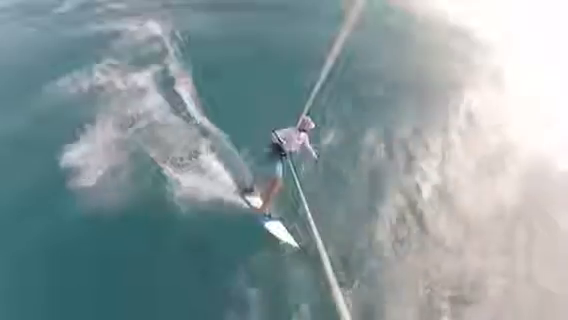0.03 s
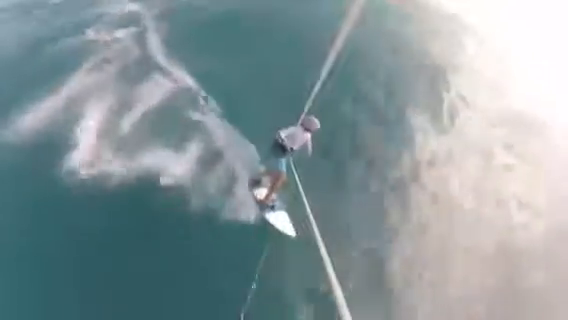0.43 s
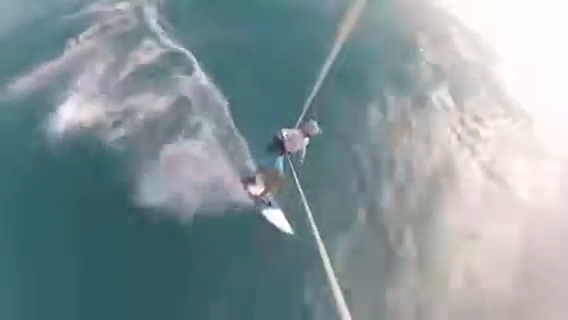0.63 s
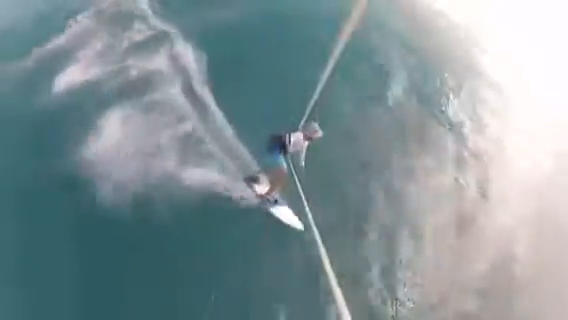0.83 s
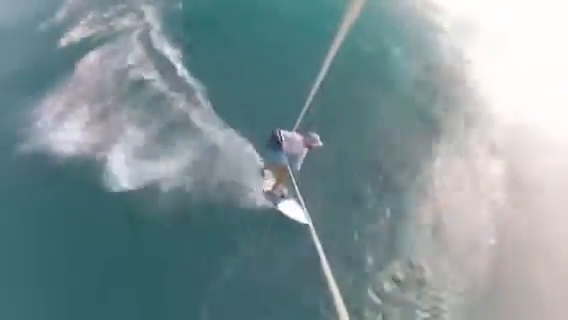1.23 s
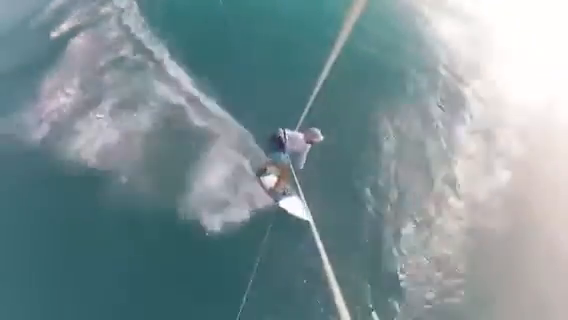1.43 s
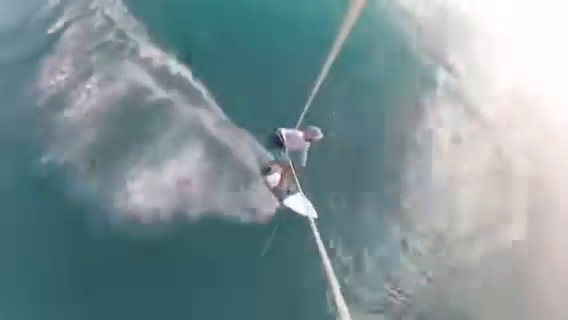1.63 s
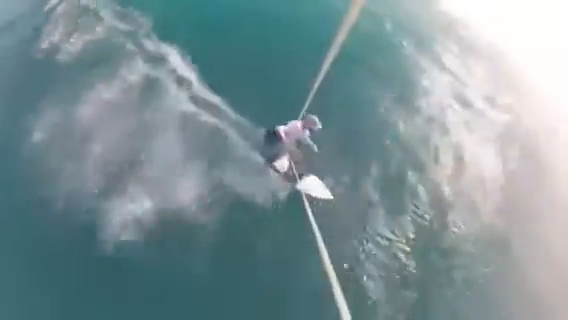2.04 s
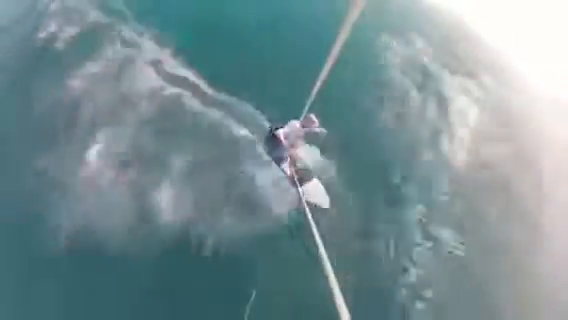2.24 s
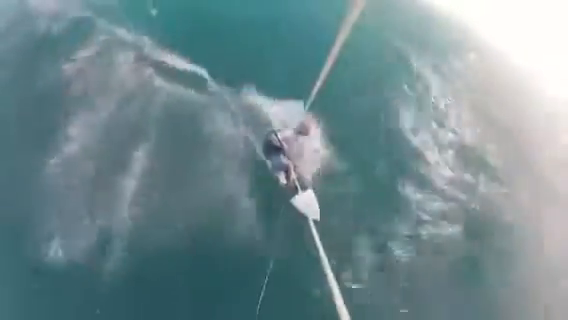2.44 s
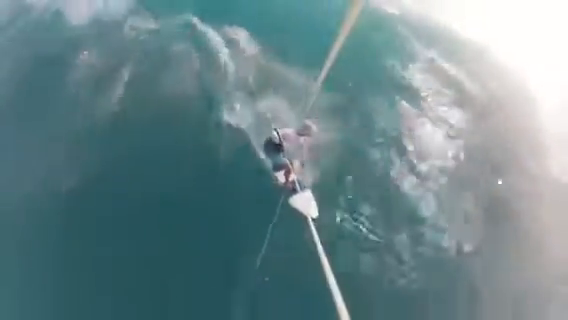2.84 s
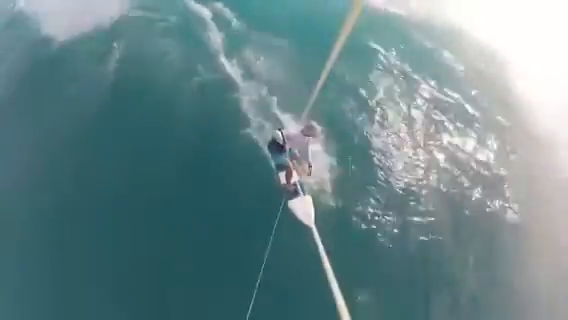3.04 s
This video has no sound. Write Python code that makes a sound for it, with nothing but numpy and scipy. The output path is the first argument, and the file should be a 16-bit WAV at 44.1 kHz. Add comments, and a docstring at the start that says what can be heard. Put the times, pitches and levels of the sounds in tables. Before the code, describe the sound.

Rumbling wind with a wavering whistle over kite lines, broken by knocks on a mount.

```python
"""A wavering whistle over rushing, rumbling wind, broken by thumps, clacks and ticks.
A camera hangs in the lines of a kite, high above the sea. The taut lines shed vortices and sing aeolian
tones whose pitch follows the airspeed; turbulent air rushes and buffets round the housing, and tugs and
contacts set the mount ringing. A slow sample-and-hold clock mirrors the whistle into the high treble."""
import sys
import numpy as np
from scipy import signal
from scipy.fft import rfft, irfft
from scipy.io import wavfile

SR = 44100
rng = np.random.default_rng(int(sys.argv[2]) if len(sys.argv) > 2 else 0)


def output_pcm(signal):
    """Save a mono or channel-first signal as 16-bit PCM at the path in sys.argv[1].

    Samples are clipped to [-1, 1] before scaling.
    """
    pcm = np.clip(np.atleast_2d(signal).T, -1, 1) * 32767
    wavfile.write(sys.argv[1], SR, np.round(pcm).astype(np.int16))


N = 136710
CONTACT_ATTACK_S = .0005


def kite_lines():
    """Vortex shedding: a line sings at a pitch proportional to airspeed over its diameter."""
    # shedding pitch set by the airspeed: time_s, pitch_hz
    shedding = [(.12, 1169), (.22, 1179), (.4, 1054), (.5, 1048), (.64, 1196), (.87, 1029), (1.02, 1109),
                (1.25, 1278), (1.36, 1124), (1.62, 1134), (1.75, 1089), (1.99, 1165), (2.16, 991),
                (2.38, 1069), (2.66, 1037), (2.84, 935.4), (3.1, 887)]
    # strength of the whistle: time_s, level_db
    strength = [(.12, -19.5), (.19, -20), (.25, -24), (.46, -19), (.54, -21), (.66, -18), (.76, -20.5),
                (.85, -21), (.92, -25.5), (1.05, -30.5), (1.14, -26), (1.22, -29), (1.34, -20),
                (1.62, -20.5), (1.8, -23), (2.0, -22), (2.15, -25), (2.47, -25), (2.75, -29), (2.83, -27),
                (3.1, -31.5)]
    # voices of the whistle: pitch_ratio, width_hz, relative_db
    lines = [(1.045, 62, -1), (.972, 62, -1.5), (.865, 90, -7), (.98, 390, -6.5)]
    # a thicker line, about an octave lower: time_s, pitch_hz, level_db
    thick_line = [(2.2, 600, -59), (2.32, 580, -37), (2.43, 570, -35.5), (2.56, 500, -50), (2.7, 455, -66),
                  (2.82, 460, -36), (3.0, 415, -49), (3.1, 410, -43)]
    # a thin line, faint and high: time_s, pitch_hz, level_db
    thin_line = [(.8, 3600, -66), (.92, 3730, -56), (1.1, 3790, -54), (1.25, 3499, -48), (1.6, 3330, -52),
                 (1.75, 3230, -63)]
    flutter_db, wander_fraction = 1.34, .01
    whistle = 0
    for ratio, width_hz, db in lines:
        gain = undb(db + flutter_db * walk(11))
        pitch_hz = curve(shedding) * ratio * (1 + wander_fraction * walk(9.03))
        whistle += gain * band(pitch_hz, width_hz)
    thick = undb(curve(thick_line, 2)) * band(curve(thick_line), width_hz=8.8)
    thin = undb(curve(thin_line, 2)) * band(curve(thin_line), width_hz=200)
    return undb(curve(strength)) * whistle + thick + thin


def thumps():
    """Damped vibration: a tug knocks the mount; the line rings on, its pitch sagging with its tension."""
    # tugs on the mount: start_s, pitch_hz, ring_db, knock_db
    tugs = [(.2095, 198, -20, -10), (0.381, 129.6, -11, -19), (.641, 122, -3, -1), (0.821, 205.3, -15, -17),
            (1.2225, 156.8, 1, -7), (2.052, 158.8, -2, 2), (2.598, 88, -4, -5)]
    attack_s, sag_per_s, knock_hz = .002, .4, 390
    octave_db, tail_db = -11, -18
    out = 0
    for start, hz, ring_db, knock_db in tugs:
        age = since(start)
        phase = 2 * np.pi * hz * (1 - np.exp(-sag_per_s * age)) / sag_per_s
        ring = np.cos(phase) + undb(octave_db) * np.cos(2 * phase)
        fade = strike(age, attack_s, t60_s=.1) + undb(tail_db) * strike(age, attack_s, t60_s=.57)
        knock = np.sin(2 * np.pi * knock_hz * age) * strike(age, CONTACT_ATTACK_S, t60_s=.012)
        out += undb(ring_db) * ring * fade + undb(knock_db) * knock
    return out


def air():
    """Turbulence: eddies rush and buffet the housing. One brief mid-pitched tick of noise is also heard."""
    # spectrum of the rush: frequency_hz, relative_db
    rush_spectrum = [(150, -46), (400, -11), (650, -5), (1000, 8.5), (1600, -2), (2200, 2.5), (2800, -5),
                     (3500, -5), (4200, -14.5), (5000, -16.5), (6000, -24)]
    # strength of the rush: time_s, level_db
    rush_level = [(.12, -40.5), (.45, -34.5), (.72, -37), (.95, -40.5), (1.1, -38.5), (1.23, -28),
                  (1.38, -35), (1.62, -31.5), (1.8, -37.5), (2.0, -32.5), (2.2, -36.5), (2.6, -38.5),
                  (3.1, -42)]
    # spectrum of the buffeting: frequency_hz, relative_db
    buffet_spectrum = [(15, -21), (30, -6), (45, -10.5), (80, 0.5), (160, 0), (230, -5), (320, -15.5),
                       (450, -19), (700, -29.5), (1500, -44)]
    # strength of the buffeting: time_s, level_db
    buffet_level = [(.12, -29.5), (.3, -29.5), (.46, -26), (.58, -29.5), (.8, -25), (.92, -29.5),
                    (1.02, -30.5), (1.12, -20.5), (1.33, -19), (1.5, -26), (1.8, -31), (1.95, -28),
                    (2.12, -23), (2.3, -32), (2.5, -29), (2.7, -24.5), (2.9, -31), (3.1, -32.5)]
    rush_flicker_db, buffet_flicker_db = 1, 2
    noise_tick_peak_s, noise_tick_decay_s, noise_tick_db = .93, .01, -25
    rush = coloured(rush_spectrum) * undb(curve(rush_level) + rush_flicker_db * walk(27))
    buffet = coloured(buffet_spectrum) * undb(curve(buffet_level) + buffet_flicker_db * walk(14))
    noise_tick_envelope = np.exp(-np.abs(np.arange(N) / SR - noise_tick_peak_s) / noise_tick_decay_s)
    return rush + buffet + undb(noise_tick_db) * noise_tick_envelope * band(hz=800, width_hz=1300)


def clacks():
    """Modal ringing: impacts excite the plastic housing; softer contacts give the high modes less."""
    # impacts of the mount: start_s, level_db, t60_s, tilt_db_per_octave
    impacts = [(0.2102, 0, .016, -8), (.38, -5.5, 0.025, 2.5), (0.818, -16.5, 0.033, -7),
               (2.054, -12, 0.0098, -10), (2.615, -16, .04, -20)]
    # modes of the housing: frequency_hz, relative_db
    modes = [(960, -7.5), (1230, -2.5), (1340, -2), (2150, -7), (2490, -7.5), (3600, -20.5)]
    pivot_hz, grit_db = modes[1][0], -17
    grit = undb(grit_db) * band(hz=2700, width_hz=2800)
    out = 0
    for start, db, t60_s, tilt in impacts:
        age = since(start)
        ring = sum(undb(mode_db + tilt * np.log2(hz / pivot_hz)) * np.sin(2 * np.pi * hz * age)
                   for hz, mode_db in modes)
        snap = grit * strike(age, CONTACT_ATTACK_S, t60_s=.014)
        out += undb(db) * (ring * strike(age, CONTACT_ATTACK_S, t60_s) + snap)
    return out


def ticks():
    """Impact noise: small fittings give bright, quickly damped bursts."""
    # contacts of the fittings: start_s, level_db
    contacts = [(0.236, -36), (.661, -37), (0.765, -34), (.995, -30), (1.279, -23), (1.283, -26),
                (1.415, -35), (2.199, -30), (2.577, -25), (2.743, -28), (2.959, -31)]
    bursts = sum(undb(db) * strike(since(start), CONTACT_ATTACK_S, t60_s=.015) for start, db in contacts)
    return band(hz=4880, width_hz=780) * bursts


def undb(db):
    """Decibels to amplitude ratio."""
    return 10 ** (np.asarray(db) / 20)


def curve(table, column=1):
    """Linear interpolation of one column of a time table, at every sample."""
    columns = np.array(table, float).T
    return np.interp(np.arange(N) / SR, columns[0], columns[column])


def walk(rate_hz):
    """Gaussian low-pass noise of rms 1 that changes about rate_hz times a second."""
    hz = np.arange(0, 4 * rate_hz, SR / N)
    draw = rng.standard_normal((N // 8, 2))[:len(hz)]
    rolloff = np.exp(-.5 * (hz[:len(draw)] / rate_hz) ** 2)
    x = irfft((draw[:, 0] + 1j * draw[:, 1]) * rolloff, N)
    return x / x.std()


def coloured(spectrum):
    """Spectral shaping of white noise, scaled to rms 1."""
    hz, db = np.array(spectrum, float).T
    bins_hz = np.fft.rfftfreq(N, 1 / SR)
    gain = undb(np.interp(np.log(bins_hz + 1), np.log(hz), db))
    x = irfft(rfft(rng.standard_normal(N)) * gain, N)
    return x / x.std()


def band(hz, width_hz):
    """Quadrature modulation: a band of noise round a steady or moving pitch."""
    phase = 2 * np.pi * np.cumsum(hz * np.ones(N)) / SR
    return (walk(width_hz / 2) * np.cos(phase) + walk(width_hz / 2) * np.sin(phase)) / np.sqrt(2)


def since(start_s):
    """Seconds since an event, zero before it."""
    return np.maximum(np.arange(N) / SR - start_s, 0)


def strike(age, attack_s, t60_s):
    """A quick rise, then exponential decay by 60 dB in t60_s."""
    return (1 - np.exp(-age / attack_s)) * np.exp(-np.log(1000) * np.minimum(age / t60_s, 10))


def scene():
    """Mid-side stereo: a very faint, independent copy of the air and whistle adds slight width."""
    side_db = -38
    centre = kite_lines() + air() + thumps() + clacks() + ticks()
    side = undb(side_db) * (air() + kite_lines())
    return centre + side * np.array([[1], [-1]])


def record(dry):
    """Spectral imaging: after a fade-in and clipping, held samples mirror the sound about the clock rate."""
    start_s, fade_s = .122, .012
    clock_hz, cutoff_hz = 12000, 15600
    fade_in = np.minimum(since(start_s) / fade_s, 1)
    clipped = np.clip(dry * fade_in, -1, 1)
    slow = signal.resample_poly(clipped, clock_hz, SR, axis=1)
    staircase = np.repeat(slow, 4, axis=1)
    held = signal.resample_poly(staircase, SR, 4 * clock_hz, axis=1)[:, :N]
    low_pass = signal.ellip(8, .2, 70, cutoff_hz, fs=SR, output="sos")
    return signal.sosfilt(low_pass, held)


dry = scene()
out = record(dry)
output_pcm(out)
```